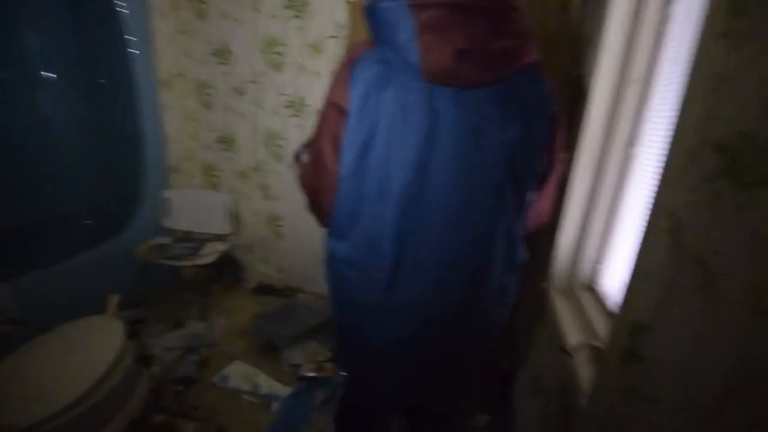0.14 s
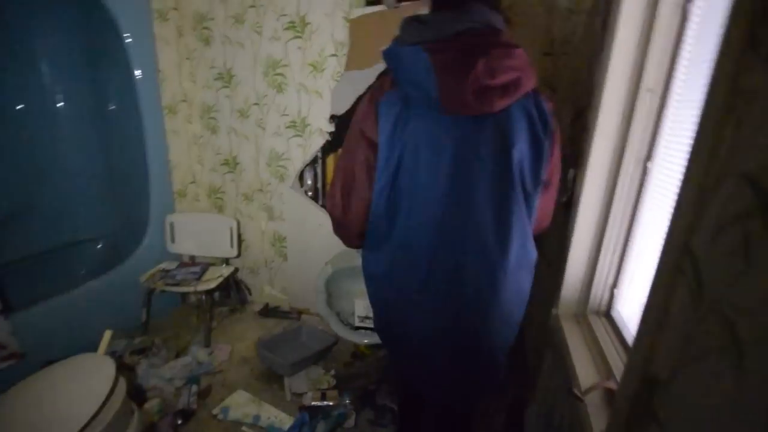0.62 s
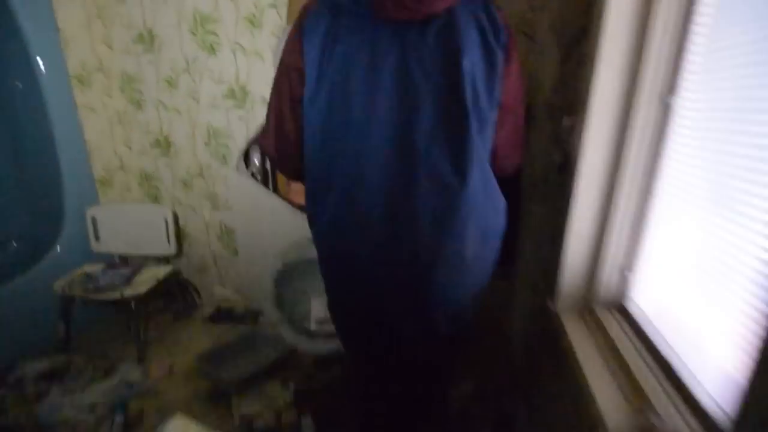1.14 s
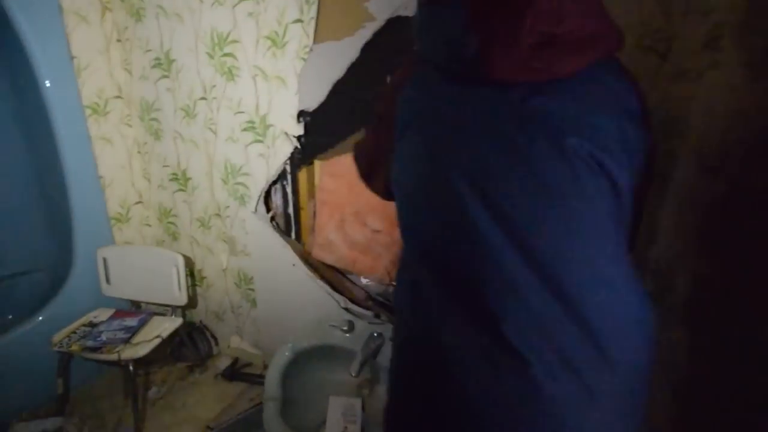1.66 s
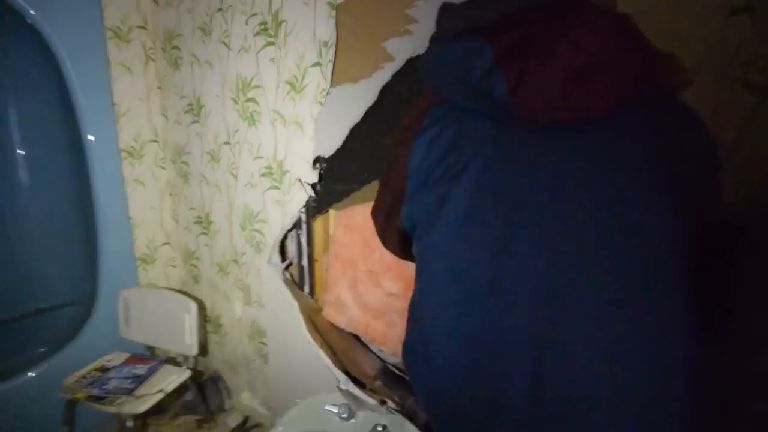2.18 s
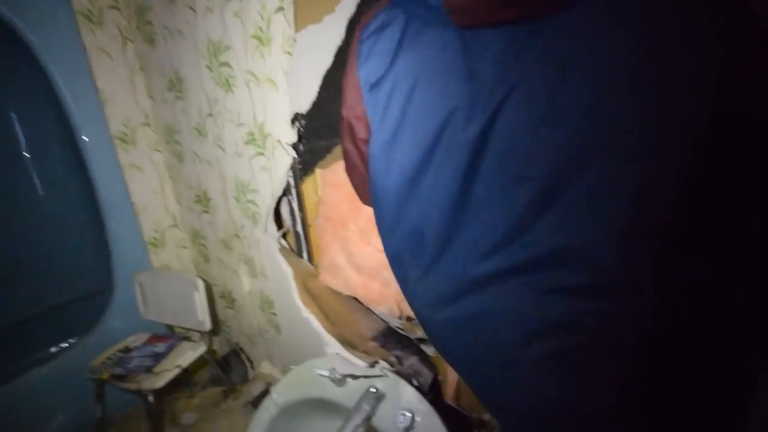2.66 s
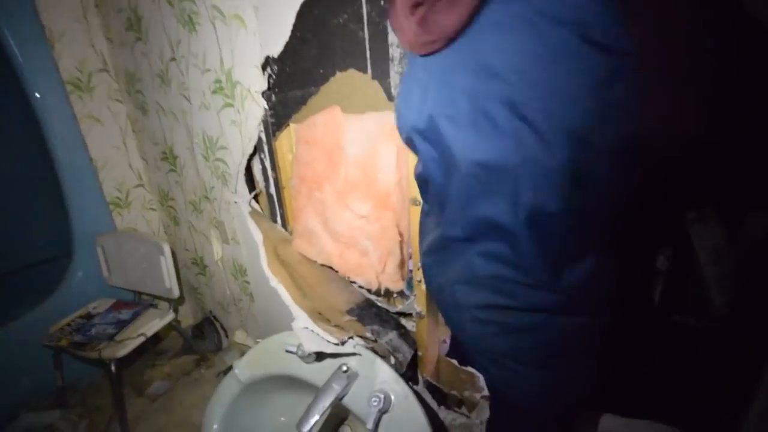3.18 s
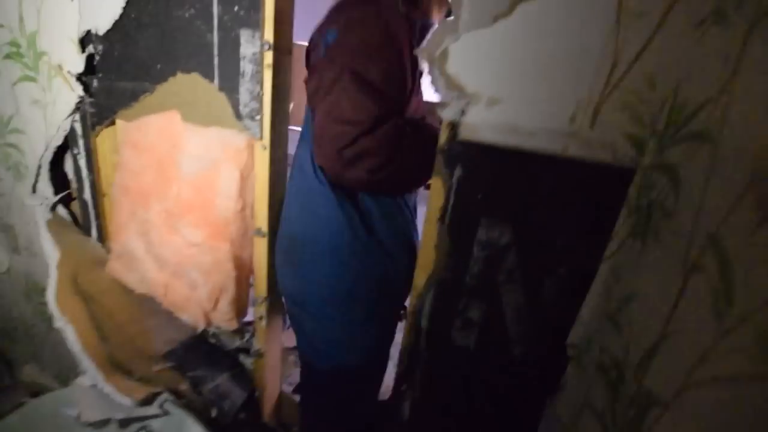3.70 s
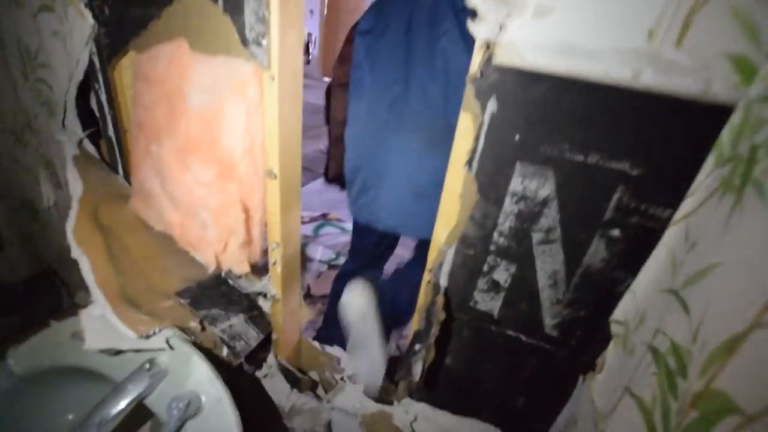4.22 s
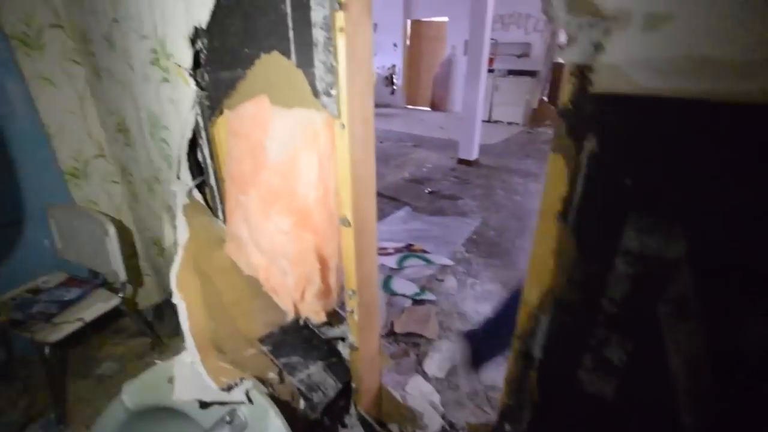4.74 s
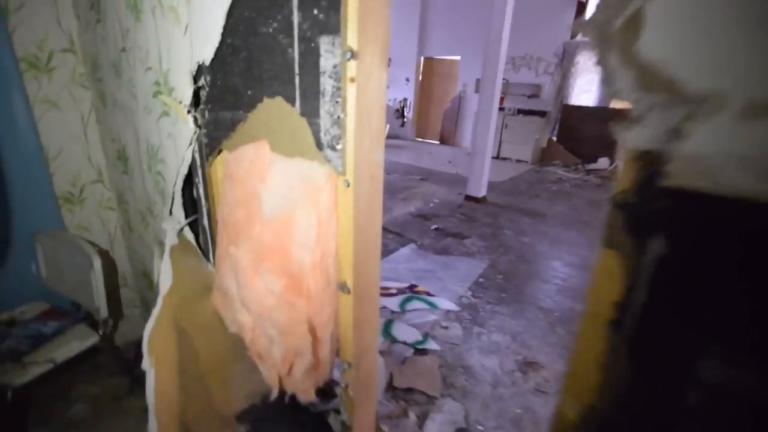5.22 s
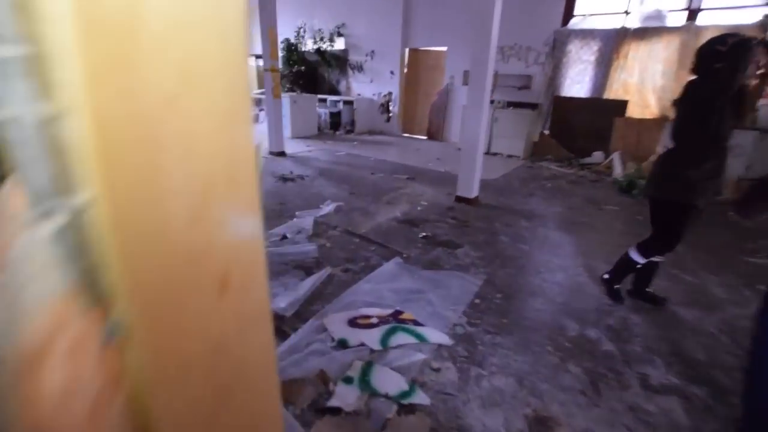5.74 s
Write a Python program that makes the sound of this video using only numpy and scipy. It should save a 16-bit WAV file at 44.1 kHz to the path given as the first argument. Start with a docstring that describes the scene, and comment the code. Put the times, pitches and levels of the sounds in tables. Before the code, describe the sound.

In a small bare derelict room, very close and mono, people step over debris and squeeze through a broken wall. From the start, feet shift on loose boards with dull thuds, crumbs grind, nylon rubs and little shards tinkle; a sharp snap comes at 0.3 s. Around 1.05 to 1.3 s a heavy deep floor jolt, rattling boards, a strong swish and a bright crack pile up. Hard knocks continue from 1.5 to 1.9 s, then a crisp snap at 2.1 s. It thins until sharp cracks at 3.0 s, a short falling wooden creak at 3.3 s and the loudest snap at 3.4 s, with a bright jacket swish. Knocks and snaps follow at 3.6 s; knocks and a glassy ring near 3.9 s. After a quieter stretch with light steps, a firm knock at 5.3 s begins more crunching, snapping and low bumps to the end. Quiet air and faint rumble persist.

```python
"""Squeezing through a broken wall

People step through a gap in a broken wall of a derelict house, close to the microphone. Filtered noise
bursts make plaster and glass snap and boards thud; enveloped grainy noise makes boards rattle, crumbs
grind and nylon jackets swish along the studs. Decaying sines make shards ring and the floor sway very low,
a gliding sine creaks, and a small bare room adds a short tail over quiet air and a far rumble."""
import sys
import numpy as np
from scipy import signal
from scipy.fft import rfft, irfft
from scipy.io import wavfile
from scipy.ndimage import uniform_filter1d

SR = 44100
rng = np.random.default_rng(int(sys.argv[2]) if len(sys.argv) > 2 else 0)


def wav_record(signal):
    """Record a signal, one row per channel, as 16-bit PCM in the file named by sys.argv[1]."""
    frames = np.transpose(np.atleast_2d(signal))
    bounded = np.clip(frames, -1, 1)
    # unit amplitude maps onto the largest positive 16-bit level
    quanta = np.round(bounded * 32767).astype(np.int16)
    wavfile.write(sys.argv[1], SR, quanta)


def attenuation_scalar(level_db):
    """Turn a level in dB into a linear amplitude multiplier (20 dB per decade)."""
    decades = np.asarray(level_db, float) / 20
    return 10 ** decades


N = 258867  # length [samples]


def read(points, hz):
    """Logarithmic interpolation: joins (frequency [Hz], gain [dB]) points on a log axis."""
    f, value = np.transpose(points)
    return np.interp(np.log(hz + 1), np.log(f + 1), value)


def curve(rows, index):
    """Linear interpolation: one column of a table at every sample, timed by the first column."""
    return np.interp(np.arange(N) / SR, np.array(rows)[:, 0], np.array(rows)[:, index])


def colour(x, db_of):
    """Linear filtering: weights the spectrum by a gain in dB over frequency, then sets the rms to 1."""
    gain = attenuation_scalar(db_of(np.fft.rfftfreq(x.shape[-1], 1 / SR)))
    y = irfft(rfft(x) * gain, x.shape[-1])
    return y / np.sqrt(np.mean(y ** 2) + 1e-20)


def add(mix, s, sound):
    """Superposition: mixes a sound in at time s."""
    part = mix[max(round(s * SR), 0):][:len(sound)]
    part += sound[:len(part)]


def gritty(per_s, spread_db, grain_s, share):
    """Granular friction: white noise, a share of it swelled by random scratches of uneven size."""
    size_db = spread_db * np.minimum(rng.exponential(1, N), 4)
    hits = (rng.random(N) < per_s / SR) * attenuation_scalar(size_db)
    lumps = signal.lfilter([1], [1, -np.exp(-1 / (grain_s * SR))], hits)
    strength = 1 - share + share * lumps / np.sqrt(np.mean(lumps ** 2))
    return rng.standard_normal(N) * strength


def stroke(s, length, db, rise_s, fade_db_per_s):
    """Envelope of one movement: swells, holds, then fades at a steady rate."""
    t = np.arange(N) / SR - s
    swell = np.clip(t / rise_s, 0, 1) ** 2
    return swell * attenuation_scalar(db - fade_db_per_s * np.maximum(t - length, 0))


# room tone spectrum: (frequency [Hz], relative gain [dB])
AIR_SPECTRUM = [(35, -36), (60, 4), (113, -11), (245, -10), (1240, -31), (3400, -43), (4000, -43),
                (12400, -34), (15300, -40), (16400, -37)]


def air():
    """Stationary noise: steady room tone."""
    return attenuation_scalar(-54.5) * colour(rng.standard_normal(N), lambda f: read(AIR_SPECTRUM, f))


def rumble():
    """Narrow-band noise: a steady far rumble around 25 Hz."""
    return attenuation_scalar(-54) * colour(rng.standard_normal(N), lambda f: -9 * np.log2((f + 1) / 26) ** 2)


def patchy(x, depth_db):
    """Time-frequency modulation: patches some 30 ms by 1.5 kHz swell and sink as folds of cloth catch."""
    z = signal.stft(x, nperseg=256)[2]
    field = rng.standard_normal(z.shape[::-1])
    field = uniform_filter1d(field, size=10, axis=0)  # smooth in time
    field = uniform_filter1d(field, size=9, axis=1).T  # smooth in frequency
    return signal.istft(z * attenuation_scalar(depth_db * field / field.std()), nperseg=256)[1][:N]


# nylon rubbing spectrum: (frequency [Hz], relative gain [dB])
NYLON_SPECTRUM = [(880, -13), (1500, 13.5), (2150, 13), (2500, 10), (8130, 8.5), (9640, 0.5), (15000, -5),
                  (15900, -23), (16400, -43)]
# jackets dragged along the studs: (start [s], time to the fade [s], level [dB],
#   brightness from -4 all dull to 4 all bright, limited beyond [dB per octave])
RUBS = [(-.1, 0.21, -45, -7), (0.24, 0.28, -46, 1.8), (0.529, 0.22, -47.5, 4), (0.795, 0.46, -58.5, 2.5),
        (1.11, .1, -39, 1), (1.153, 0.11, -34.5, 3.5), (1.285, 0.17, -36.5, -2.5), (1.567, 0.31, -55.5, 8),
        (1.755, 0.39, -51, -3.5), (2.098, 0.16, -48, 2.5), (2.288, 0.76, -54, 2), (2.843, 0.3, -47.5, 4),
        (3.078, 0.47, -46, 1), (3.44, 0.44, -39, 4), (3.892, 0.14, -46, -2.5), (4.597, 0.28, -69, 6),
        (5.198, 0.24, -54.5, 4), (5.423, 0.19, -46, 6), (5.72, .2, -64, -7)]


def swish():
    """Sliding friction: fine grains in strokes that swell and fade, between a dull and a bright rub."""
    x = patchy(gritty(per_s=400, spread_db=3, grain_s=.0015, share=.25), depth_db=2.2)
    dull = colour(x, lambda f: read(NYLON_SPECTRUM, f) - 4 * np.log2(f / 6000 + 0.13))
    bright = colour(x, lambda f: read(NYLON_SPECTRUM, f) + 4 * np.log2(f / 6000 + 0.16))
    out = attenuation_scalar(-60) * (dull + bright) / 2  # the sleeves never quite stop brushing
    for s, length, db, tilt in RUBS:
        mix = np.clip(.5 + tilt / 8, 0, 1)
        rub = (1 - mix) * dull + mix * bright
        out = out + stroke(s, length, db, rise_s=0.089, fade_db_per_s=126) * rub
    return out


# feet taking weight and scraping: (start [s], time to the fade [s], board rattle level [dB],
#   loose grit under the sole, added to the crumbs alone [dB])
SHIFTS = [(-.1, .14, -34.5, -8.5), (.1, .34, -47.5, -3.5), (0.43, 0.16, -39.5, -4),
          (0.567, 0.11, -39.5, -1.5), (0.657, 0.15, -39.5, -0.5), (.86, 0.45, -47, -6.5),
          (1.11, 0.18, -34, -4), (1.174, 0.089, -22, -1.5), (1.338, 0.19, -35, 1), (1.55, 0.32, -31.5, -8),
          (1.774, .12, -31, -6.5), (1.904, 0.099, -46.5, -3), (2.036, 0.13, -51, 8.5),
          (2.204, 0.85, -48, -1.5), (2.904, 0.14, -41, 5.5), (3.07, 0.18, -39, -1),
          (3.195, 0.16, -40, -0.5), (3.385, 0.14, -42.5, 4.5), (3.516, 0.092, -34.5, -0.5),
          (3.66, 0.21, -47.5, 6.5), (3.86, 0.14, -30.5, -7), (4.055, 0.17, -51, -6.5),
          (4.583, 0.2, -45, -15), (4.744, 0.072, -54.5, -4), (5.236, 0.11, -30, -7),
          (5.447, 0.14, -35, -2.5), (5.675, .2, -44.5, -4)]


def underfoot(db_of):
    """Power summation of the weight shifts; db_of gives a layer's level from rattle and grit."""
    power = attenuation_scalar(db_of(-61.5, 0)) ** 2  # boards and crumbs stay faint even under still feet
    for s, length, db, grit_db in SHIFTS:
        power = power + stroke(s, length, db_of(db, grit_db), rise_s=0.058, fade_db_per_s=137) ** 2
    return np.sqrt(power)


# plaster crumb spectrum: (frequency [Hz], relative gain [dB])
CRUMB_SPECTRUM = [(290, -11), (500, -5.5), (572, 4), (953, 4), (1400, 0), (2670, -6.5), (6000, -16.5),
                  (7800, -51), (13200, -120)]


def debris():
    """Granular friction: plaster crumbs under soles follow the weight less steeply than the boards do."""
    crumbs_db, follow, mean_effort_db = -42.5, 0.76, -40.5  # follow: crumb dB per dB of board rattle
    level = underfoot(lambda db, grit_db: crumbs_db + follow * (db - mean_effort_db) + grit_db)
    grains = gritty(per_s=130, spread_db=9.2, grain_s=0.0067, share=0.4)
    return level * colour(grains, lambda f: read(CRUMB_SPECTRUM, f))


# loose board spectrum, used in full by the rattle and in part by the thuds:
#   (frequency [Hz], relative gain [dB])
BOARD_SPECTRUM = [(35, -39), (60, -4), (92, 0.5), (213, 8), (279, 2.5), (525, 1.5), (584, -5.5), (924, -15),
                  (1040, -26), (1500, -40), (1950, -45), (3300, -120)]


def rattle():
    """Repeated random impacts: loose boards knock unevenly while weight shifts."""
    knocks = gritty(per_s=40, spread_db=2.5, grain_s=0.028, share=0.61)
    return underfoot(lambda db, grit_db: db) * colour(knocks, lambda f: read(BOARD_SPECTRUM, f))


# body weight dropping on the joists: (time [s], level [dB], pitch [Hz], decay time t60 [s])
JOLTS = [(-.04, -26.5, 47, 0.37), (0.259, -28.5, 43.6, 0.23), (.67, -41, 43.6, .5),
         (0.799, -37.5, 47.2, 0.28), (.96, -39, 42, .9), (1.048, -20.5, 41.6, 0.58), (1.12, -23, 42.6, .3),
         (1.58, -33, 42, 0.48), (2.06, -34, 54, 0.43), (2.49, -38, 44.7, 0.45), (2.63, -31.5, 40, 0.26),
         (3.42, -36, 44, .5), (3.6, -43, 43.6, .5), (3.91, -38, 44, 1), (5.07, -36.5, 43.5, 0.4),
         (5.25, -36, 43.2, 0.45), (5.38, -33, 44, .4), (5.68, -27, 39.9, 0.52), (5.75, -25, 40, 0.15)]


def sway():
    """Damped resonance of the joists' lowest mode: each jolt swells and dies, over a random tremble."""
    out = attenuation_scalar(-47) * colour(rng.standard_normal(N), lambda f: -12 * np.log2((f + 1) / 41.2) ** 2)
    rise_s = 0.031
    for s, db, hz, t60 in JOLTS:
        t = np.maximum(np.arange(N) / SR - s, 0)
        late = np.maximum(t - rise_s, 0)
        envelope = np.minimum(t / rise_s, 1) * attenuation_scalar(db - 60 * late / t60)
        out = out + envelope * np.sin(2 * np.pi * hz * t)
    return out


# small glass shards set ringing:
#   (time [s], modes as (frequency [Hz], starting level [dB], decay time t60 [s]))
SHARDS = [(0, [(1262, -41, .3), (2595, -46, .4), (2865, -37, .15), (3390, -39, .17), (3500, -38, .25),
          (4455, -43, .25), (5046, -45, .2), (9300, -52, .12)]), (1.884, [(5435, -45, .1), (5990, -40, .3),
          (8260, -50, .2), (9459, -47, .15), (13749, -53, .14), (15400, -62, .06)]),
          (3.945, [(1476, -36, .2), (3062, -28, .08), (5900, -41, .15), (7281, -28, .09), (7330, -42, .35),
          (8509, -37, .17), (12100, -52, .35), (12670, -45, .07), (14500, -48, .12)]),
          (3.998, [(6500, -38, .05), (9600, -48, .3), (10300, -44, .04)]), (5.178, [(1100, -50, .3),
          (1480, -51, .35), (2690, -50.5, .12)])]


def shards():
    """Modal decay: each shard is a sum of thin, exponentially dying tones."""
    out, t = np.zeros(N), np.arange(SR // 3) / SR
    for s, modes in SHARDS:
        for hz, db, t60 in modes:
            add(out, s, attenuation_scalar(db - 60 * t / t60) * np.sin(2 * np.pi * hz * t))
    return out


# feet and knocks on the boards: (time [s], peak level before the bass cut [dB], pitch [Hz],
#   rattle decay time t60 [s], hardness as added spectral tilt [dB per octave])
THUDS = [(0.0479, -23, 227, 0.37, -14), (0.4409, -17, 323, 0.24, 3), (0.6115, -29.5, 330, 0.12, 4),
         (.7183, -18, 580, 0.17, -3), (0.8104, -21.5, 264, 0.17, 0), (0.8684, -23.5, 324, 0.13, -7.5),
         (0.9917, -41, 350, .14, 4), (1.059, -17, 200, 0.084, -24), (1.0978, -17, 392, 0.22, -2.5),
         (1.134, -17, 180, .2, -9), (1.2191, -10.5, 318, 0.1, 0), (1.2412, -16, 240, 0.24, -9),
         (1.2648, -20.5, 193, 0.15, 9), (1.393, -27, 174, 0.31, 1), (1.5009, -14.5, 174, 0.22, -3),
         (1.552, -8, 463, .13, -3.5), (1.5961, -29.5, 318, 0.44, -1), (1.7156, -15.5, 187, 0.52, 0),
         (1.7918, -9, 298, 0.15, 4.5), (1.8055, -16.5, 260, 0.14, 0), (1.8853, -22, 350, 0.54, 3),
         (2.0564, -18, 348, 0.23, 3.5), (2.095, -26, 128, 0.22, -6), (2.5128, -28, 195, .11, -5),
         (2.617, -33, 186, 0.12, -8), (2.8642, -24.5, 254, 0.2, -4), (3.095, -28.5, 111, 0.086, 0.5),
         (3.1314, -23.5, 230, 0.16, -5), (3.2654, -27.5, 517, .19, 21), (3.4036, -23, 740, 0.16, 0),
         (3.5182, -22, 266, 0.16, 3), (3.5821, -16, 260, 0.12, 3.5), (3.8139, -24, 490, 0.4, -7),
         (3.906, -18, 296, 0.23, -0.5), (3.9192, -15, 307, 0.35, 3), (3.936, -15, 395, 0.21, -1),
         (4.4415, -27.5, 294, 0.15, -10), (4.5192, -22, 284, 0.088, -10), (4.543, -32.5, 169, 0.26, -5),
         (4.6178, -30.5, 152, .22, -9), (4.6544, -31.5, 320, 0.16, -3), (5.082, -28.5, 262, 0.19, -21),
         (5.1723, -37, 312, 0.55, -5), (5.2238, -28.5, 200, 0.02, 0), (5.271, -13.5, 540, 0.28, 4),
         (5.3681, -22, 171, 0.063, 1.2), (5.4792, -25.5, 513, 0.12, -3.5), (5.6679, -23.5, 190, 0.091, -3),
         (5.7154, -30.5, 160, 0.29, -2)]


def thuds():
    """Impact excitation: a push of a cycle or two at the board's pitch, and a rough burst of rattle."""
    out, t = np.zeros(N), np.arange(16384) / SR
    noises = rng.standard_normal((len(THUDS), len(t)))
    for (s, db, hz, t60, tilt), noise in zip(THUDS, noises):
        burst = colour(noise, lambda f: 0.38 * read(BOARD_SPECTRUM, f) + tilt * np.log2(f / 300 + 0.25)
                       + 8 * np.exp(-(np.log((f + 1) / hz) / 0.11) ** 2)  # resonance at the pitch
                       - 20 * np.log10(1 + (f / 2500) ** 4))
        burst *= (1 - np.exp(-t / 0.00083)) * attenuation_scalar(-60 * t / t60)
        cycles = t * hz
        push = 2.01 * np.sin(2 * np.pi * cycles) * 5 * cycles * np.exp(-2 * cycles)
        blow = push + burst
        add(out, s, attenuation_scalar(db) * blow / abs(blow).max())
    return signal.lfilter(*signal.butter(2, 100, "high", fs=SR), out)  # the deep bass below about 100 Hz is cut away


# debris snapping: (time [s], snap peak level [dB], ring frequency [Hz],
#   added brightness [dB per octave], tail against snap before their envelopes [dB])
CRACKS = [(0.0526, -36, 1000, 1, -4), (0.0982, -37, 1480, -8, -11), (0.149, -34.5, 1390, -23, -26),
          (.333, -14.5, 6500, 4.5, -13.5), (0.3596, -22, 7190, 3, -10), (.4399, -20.5, 12100, 0, -5),
          (.539, -34, 1310, -2, -3.5), (.6057, -29.5, 12000, 6, 0), (0.6376, -21, 7050, 3, -4.5),
          (.715, -22, 1200, -7, -8), (0.8106, -31, 2700, -6.5, 0), (0.845, -32.5, 11900, 6, -4),
          (1.0971, -35.5, 12000, 0, 7.5), (1.1776, -29, 12200, -6, 0), (1.2094, -10.5, 12000, 2.5, -6),
          (1.474, -24.5, 9000, -1.5, -1), (1.5515, -23, 2220, -10.5, -8), (1.581, -30, 5500, 5, -16),
          (1.687, -32, 1570, 1, -6), (1.7155, -17.5, 2150, -5, -8), (1.7437, -26, 7000, -4.5, 2),
          (1.79, -21.5, 1160, 0.5, -7), (1.8546, -30, 7960, -1, -24), (1.8845, -22, 2200, -6, -12),
          (2.0553, -21.5, 1490, -2.5, -6.5), (2.0998, -20, 4480, 0, -21), (2.1037, -9.5, 5300, 2, -14),
          (2.2393, -20.5, 2700, -6, -9.5), (2.549, -34, 2060, -11, -13), (2.5977, -34, 11900, -8, -15),
          (2.8292, -30, 8100, 7, -11.5), (2.913, -25, 2490, -12, -12), (2.946, -21, 2030, -9.5, -13),
          (3.001, -7.5, 1680, -4, -17.5), (3.0111, -10.5, 1670, -1.5, -14), (3.131, -24.5, 1930, 9, -12),
          (3.1876, -21, 7680, -2.3, -12), (3.32, -30, 1080, 10, -21), (3.4023, -3, 2500, 2, -18),
          (3.5119, -18.5, 7600, -1, -6), (3.5752, -12, 8100, -5.5, -17), (3.5883, -18, 1410, 4, -14),
          (3.6515, -23, 12000, -4.5, -10), (3.868, -25.5, 12000, 0, -19), (3.906, -32, 1200, 1, 2),
          (3.9211, -22.5, 2270, -2, -25), (3.9353, -22.5, 2000, -2, -9), (3.9453, -23, 7650, -2, -2.5),
          (4.036, -33, 6000, 0, -20), (4.243, -39, 2680, 5, -23), (4.44, -25, 2060, -7.5, -5),
          (4.655, -36, 1145, 10, -17), (4.6746, -34, 12000, -2.5, -11), (4.729, -29.5, 7700, -6.5, -23),
          (4.743, -35, 12140, -8, -14), (4.8119, -34, 11300, -0.5, -26), (5.149, -52, 1220, 6, 3),
          (5.1814, -46.5, 1143, -0.5, 4), (5.2714, -14.5, 1080, -7.5, -12.5),
          (5.3066, -28, 1000, 4.5, -6.5), (5.4197, -23, 8150, 9, -10), (5.446, -28, 2350, 5, -15),
          (5.4789, -31.5, 12000, -6, -9), (5.5094, -19.5, 10300, 2, -13), (5.5444, -32, 12200, -3, 0),
          (5.5765, -27.5, 2150, -15, -3), (5.6155, -20, 2180, 0.3, -12.5), (5.7382, -28.5, 5450, 4, -5),
          (5.8174, -36, 2040, -13, -22)]


def cracks():
    """Brittle fracture: a few milliseconds of ringing snap, then a scatter of bits that rings less."""
    out, t = np.zeros(N), np.arange(16384) / SR
    scatter_t60_s = 0.18  # how long the bits keep skittering
    noises = rng.standard_normal((len(CRACKS), len(t)))
    for (s, db, hz, tilt, tail_db), noise in zip(CRACKS, noises):
        bits = colour(noise, lambda f: tilt * np.log2(f / 3000 + 0.015)
                      - 12 * np.log2(1 + (700 / (f + 1)) ** 2)  # little bass
                      - 12 * np.log2(1 + (f / 9500) ** 3))  # soft top
        snap = colour(bits, lambda f: 9 * np.exp(-(np.log((f + 1) / hz) / 0.33) ** 2))
        tail = colour(bits, lambda f: 6.5 * np.exp(-(np.log((f + 1) / hz) / 0.33) ** 2))
        snap *= (1 - np.exp(-t / .0002)) * np.exp(-t / .0022)
        tail *= attenuation_scalar(tail_db - 60 * t / scatter_t60_s) * (1 - np.exp(-t / .005))
        add(out, s, attenuation_scalar(db) * (snap + tail) / abs(snap).max())
    return out


# a board creaks as it bends: (time [s], level before the lumps [dB], pitch [Hz])
CREAK = [(3.255, -54, 539), (3.27, -34, 532), (3.282, -23.5, 517), (3.297, -32, 437), (3.312, -44, 446),
         (3.325, -52, 440)]


def creak():
    """Stick-slip friction: a short falling groan of lumpy strength."""
    lumps = 1 + 0.3 * colour(rng.standard_normal(N), lambda f: -6 * np.log2(1 + (f / 60) ** 2))
    sample = np.arange(N)
    on = (sample > CREAK[0][0] * SR) & (sample < CREAK[-1][0] * SR)
    phase = 2 * np.pi * np.cumsum(curve(CREAK, index=2)) / SR
    return on * lumps * attenuation_scalar(curve(CREAK, index=1)) * np.sin(phase)


def room(x, tail_db, t60):
    """Diffuse reverberation: adds the walls' dense decaying tail after a 4 ms gap."""
    t = np.arange(SR // 2) / SR
    tail = rng.standard_normal(len(t)) * attenuation_scalar(-60 * t / t60) * (t > .004)
    return x + attenuation_scalar(tail_db) * signal.oaconvolve(x, tail / np.linalg.norm(tail))[:N]


def scene():
    """Superposition: near sources in the room, with shards, sway, air and rumble added dry."""
    background = air() + rumble()
    near = cracks() + thuds() + swish() + debris() + rattle() + creak()
    return (room(near, tail_db=-12, t60=.3) + shards() + sway() + background)[None]


def band_limit(x):
    """A steep low-pass at the top of the band."""
    return signal.sosfilt(signal.butter(12, 16520, fs=SR, output="sos"), x)


def record(dry):
    """Single-channel pickup: the finished mix stays mono, with no further change of level."""
    return band_limit(dry)


dry = scene()
out = record(dry)
wav_record(out)
```